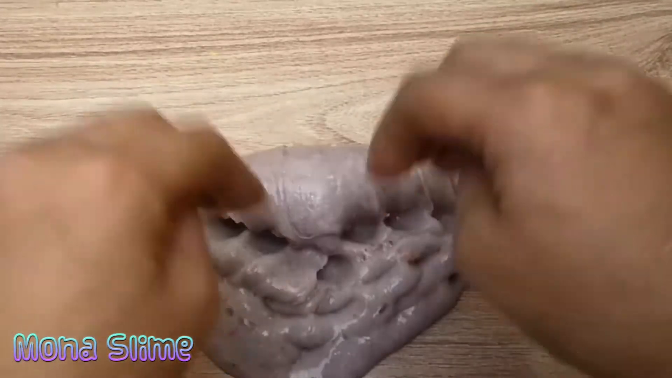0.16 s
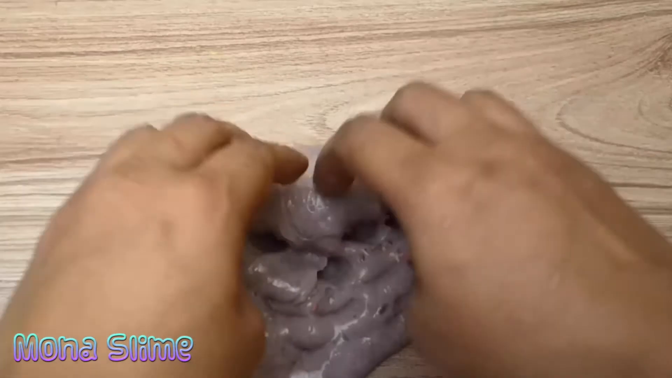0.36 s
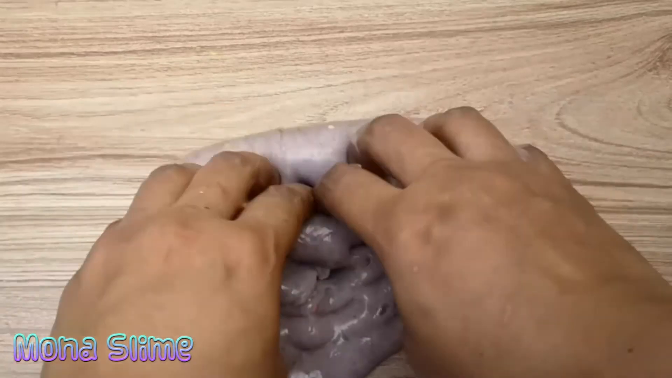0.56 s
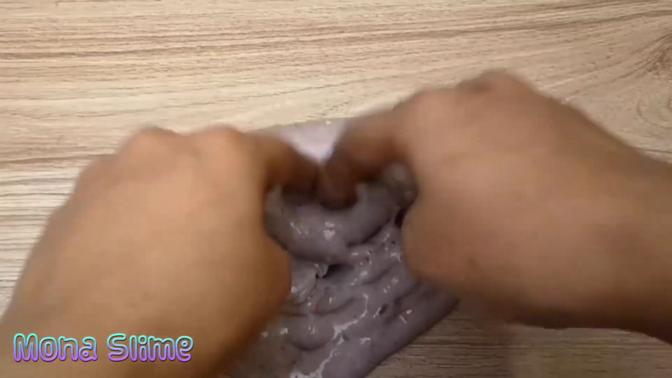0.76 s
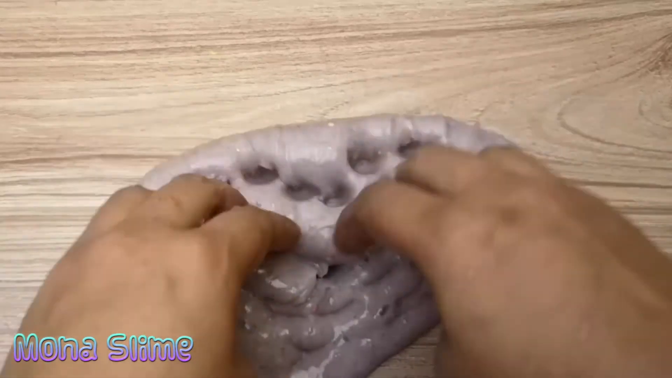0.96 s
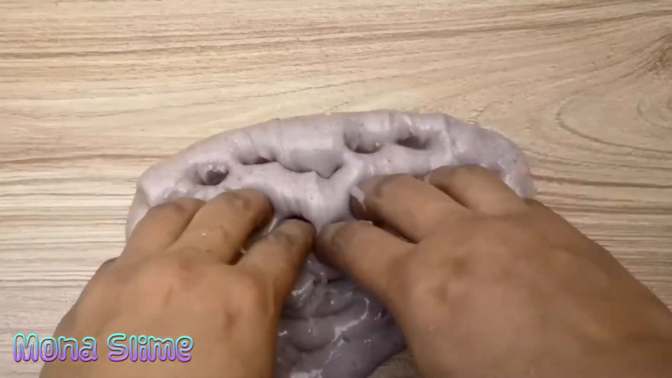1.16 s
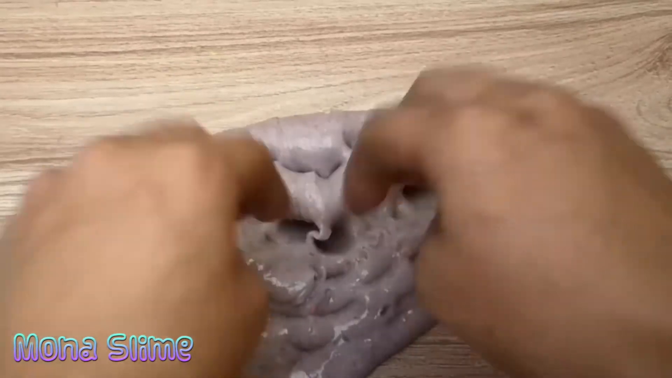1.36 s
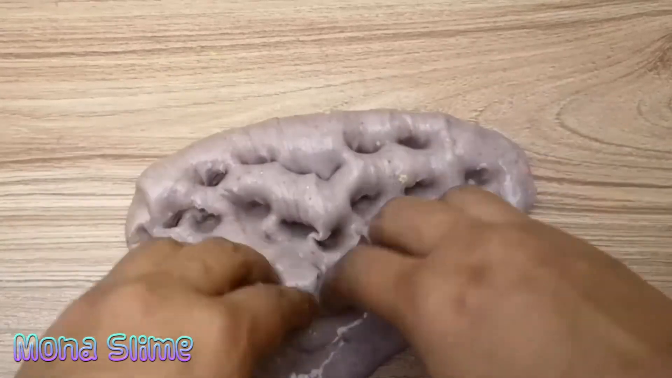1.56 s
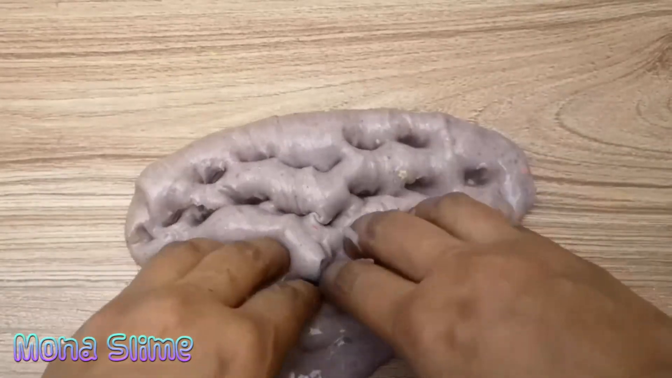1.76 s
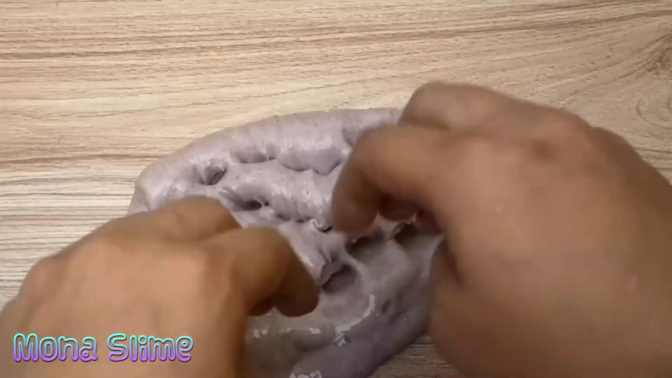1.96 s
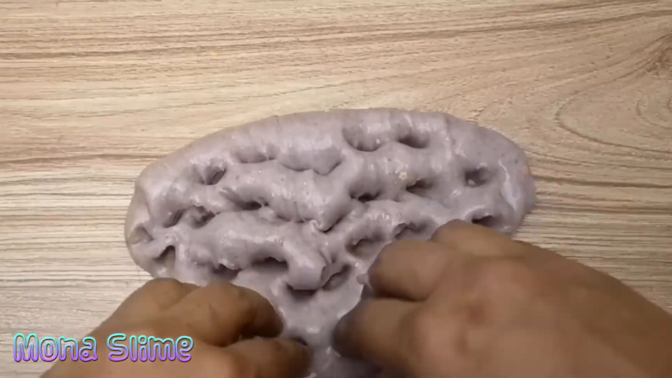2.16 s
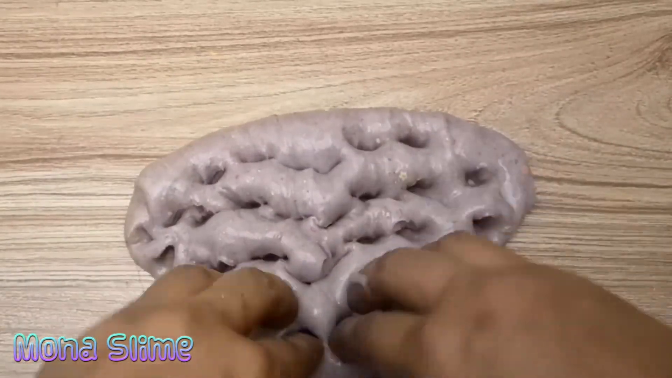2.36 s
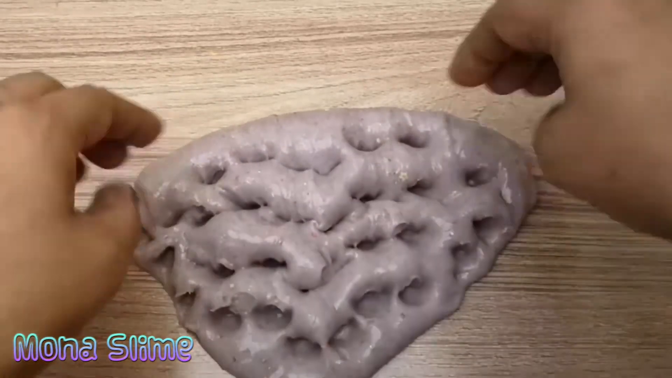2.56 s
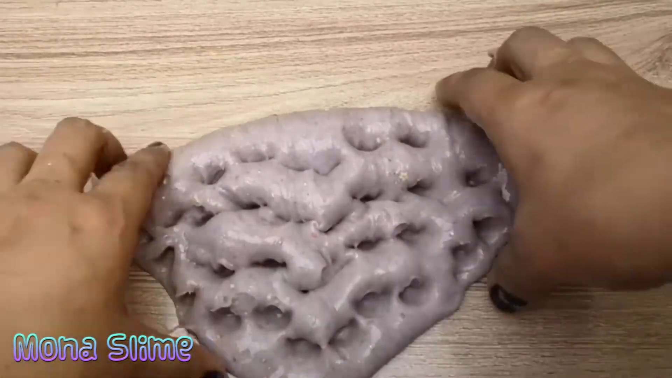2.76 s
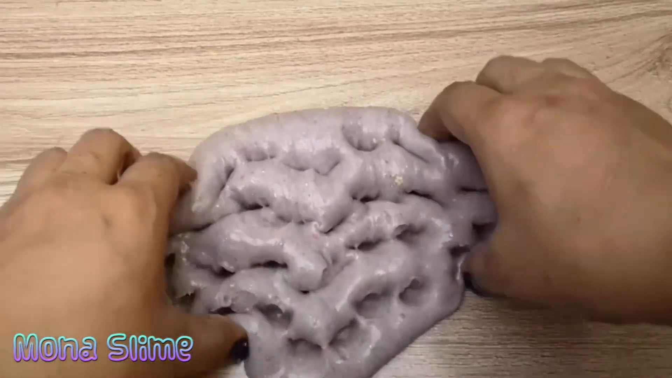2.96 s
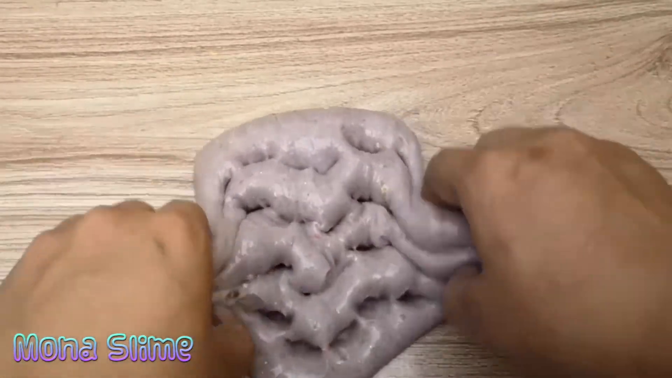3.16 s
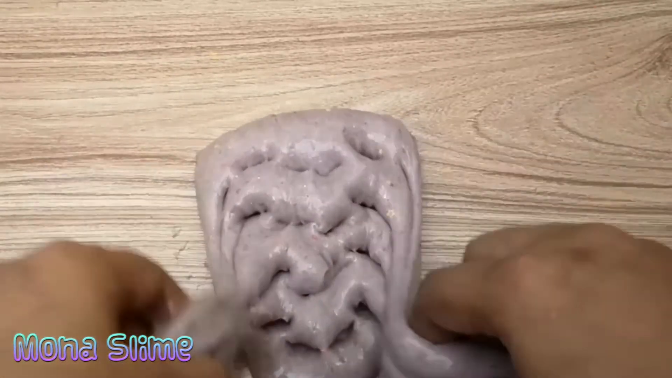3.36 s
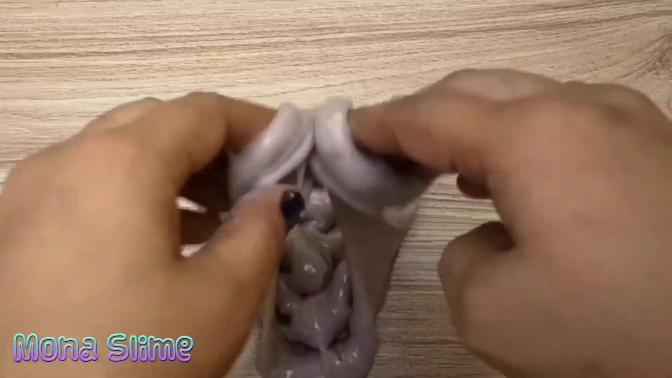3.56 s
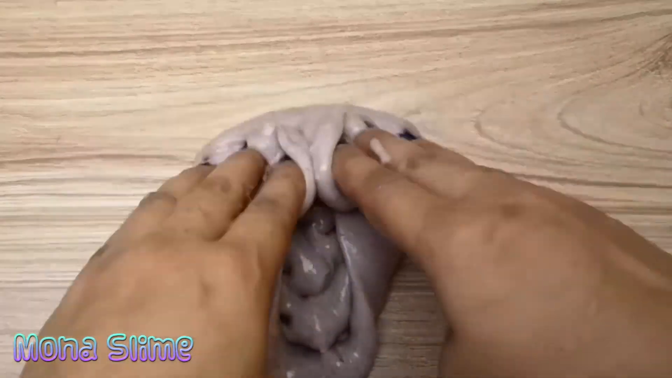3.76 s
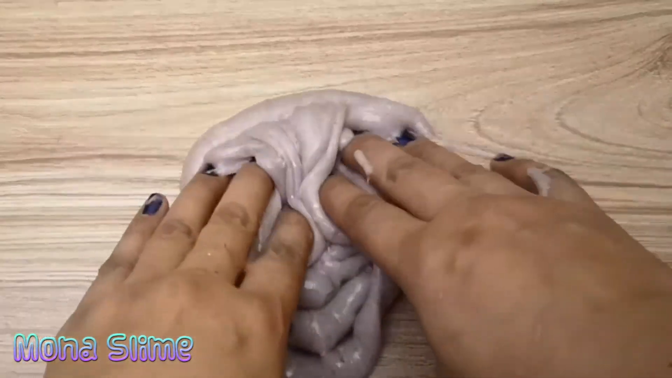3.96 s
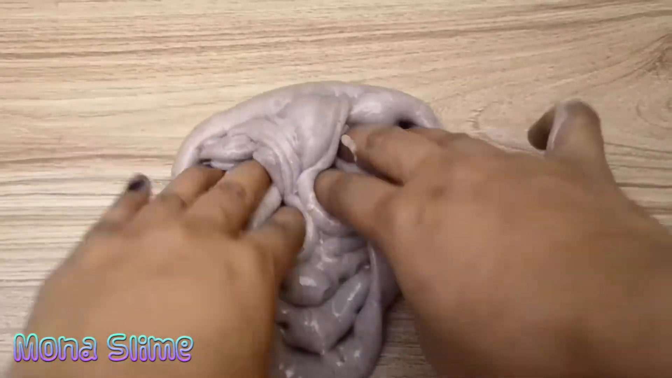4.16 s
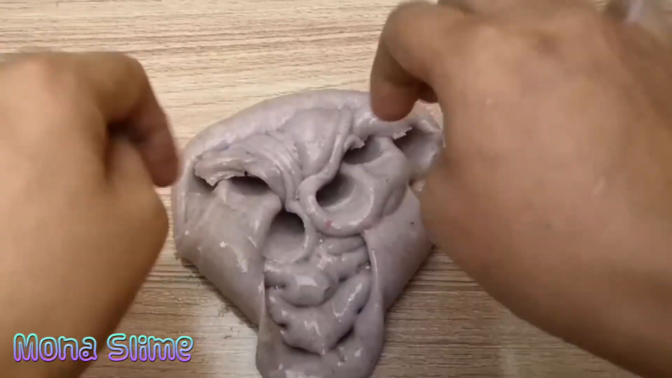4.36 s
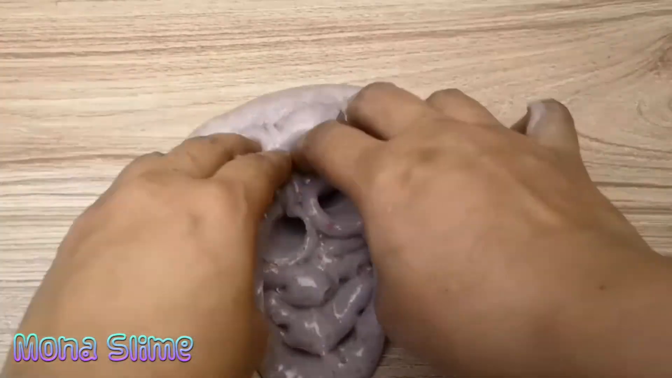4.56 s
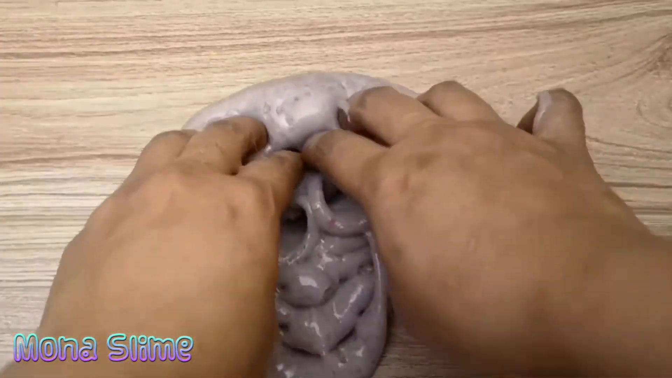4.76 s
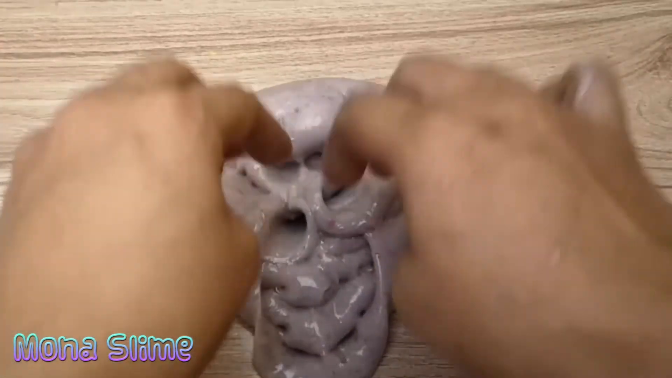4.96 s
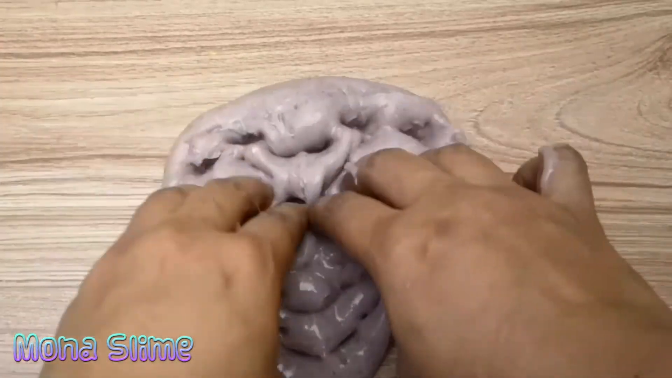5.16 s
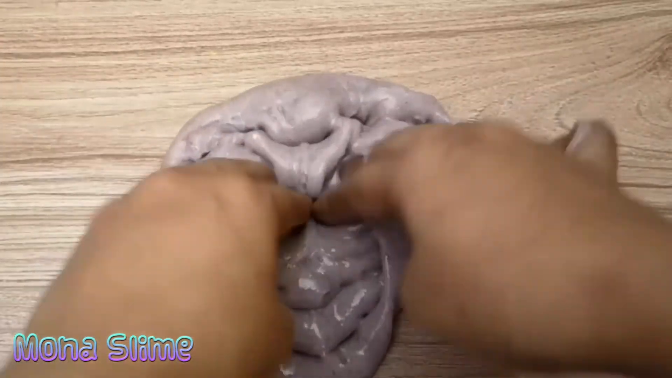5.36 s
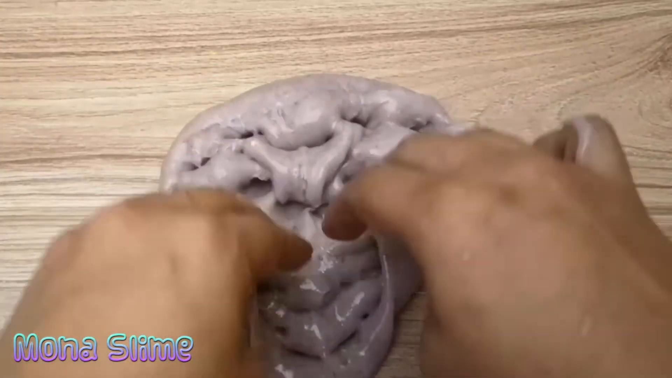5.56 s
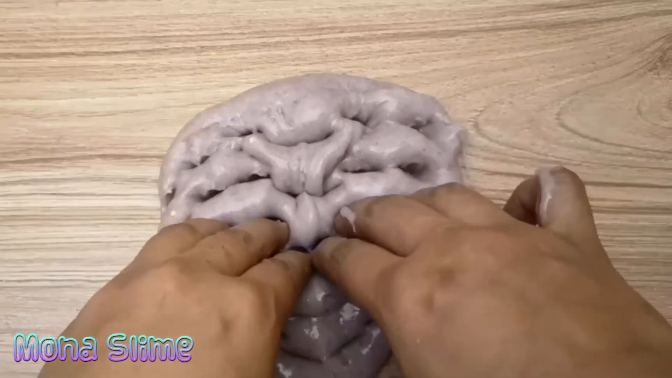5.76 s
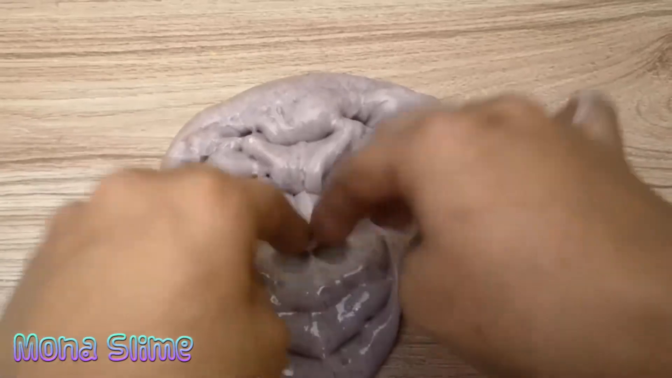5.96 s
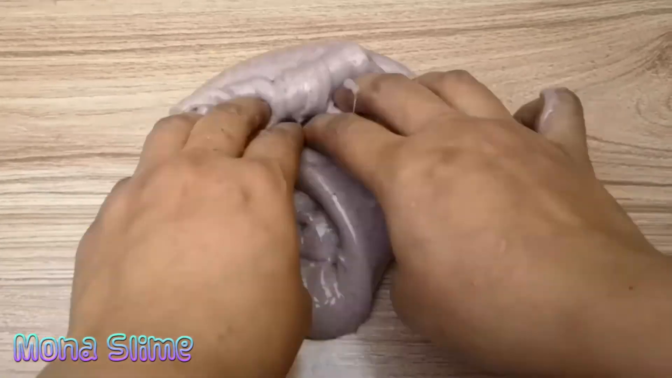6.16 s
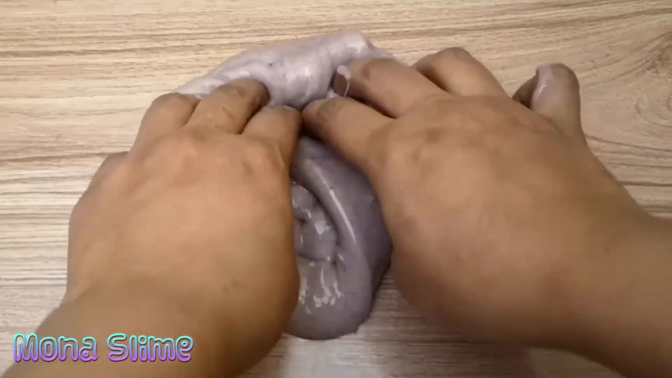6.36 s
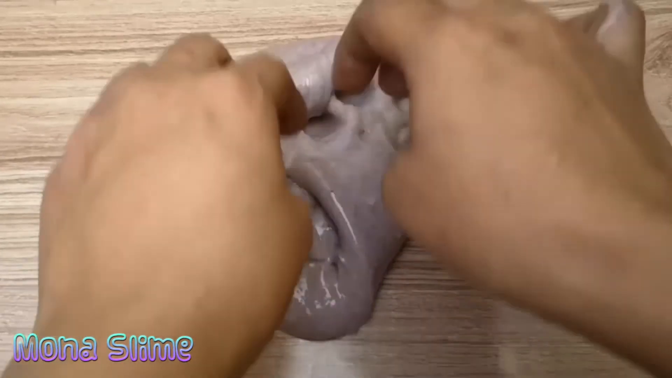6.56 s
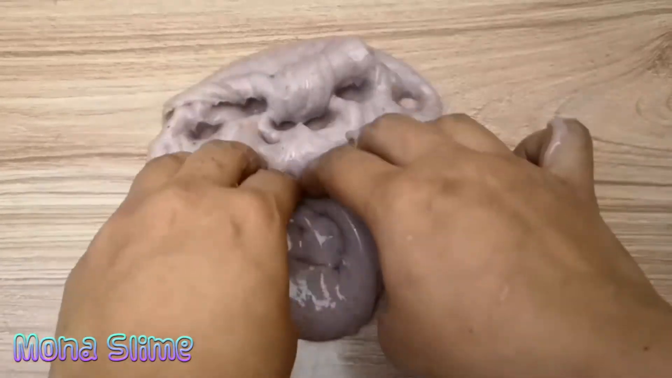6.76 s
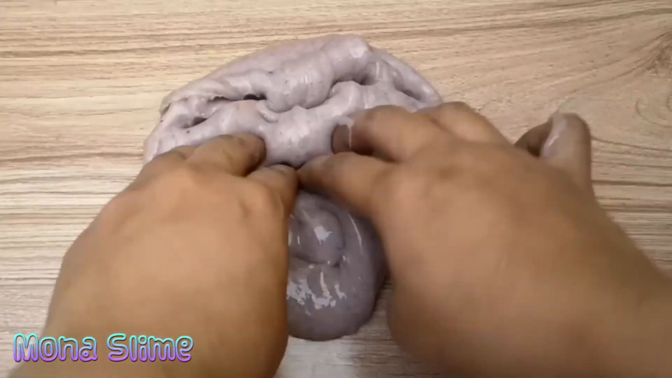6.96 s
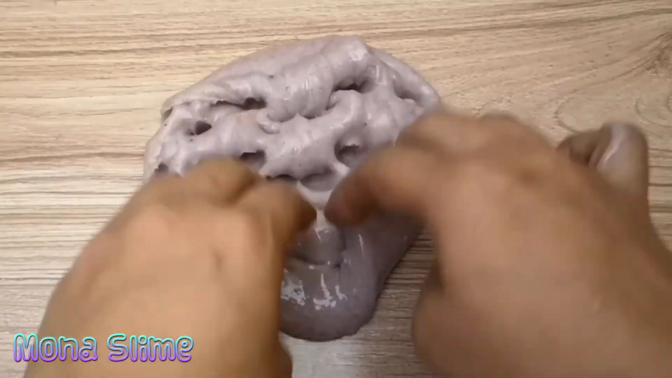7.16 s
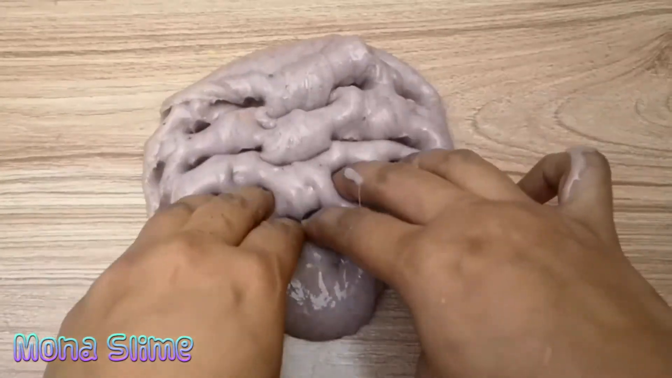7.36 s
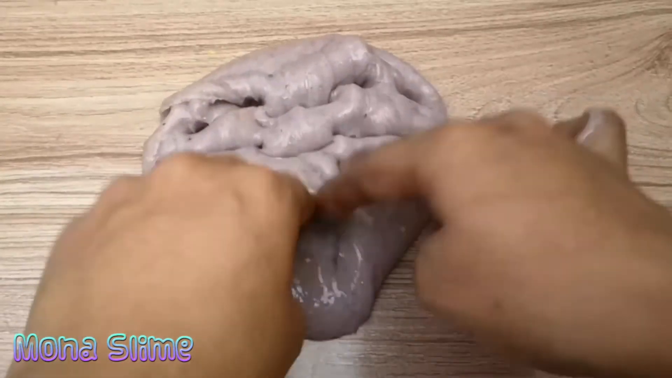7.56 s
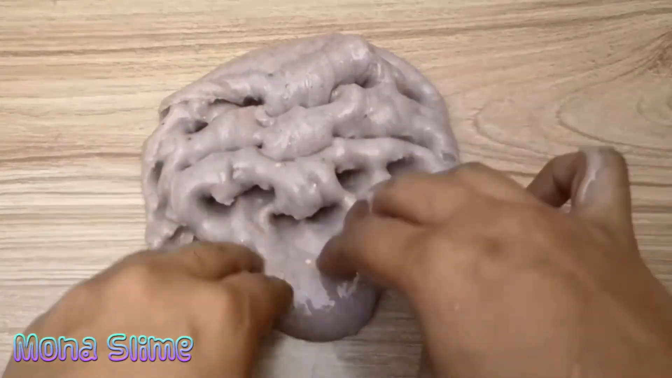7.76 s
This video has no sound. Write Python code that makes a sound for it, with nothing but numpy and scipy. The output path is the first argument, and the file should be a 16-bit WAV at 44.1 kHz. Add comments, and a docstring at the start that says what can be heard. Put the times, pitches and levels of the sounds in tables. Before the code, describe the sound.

Fingers poke thick, glossy slime on a wooden table, heard very close in stereo in a small quiet room. At the very start a few light, thin pops finish a press. Fuller presses follow at about 0.8, 1.3, 1.9 and 2.4 seconds, each a rapid cluster of four to ten sharp film snaps, hollow air-pocket pops with a tiny upward chirp, and soft low thuds. From about 2.6 to 4.2 there is a pause with only an extremely faint tick near 4.1. A short bright burst comes at 4.2, then dense, crisp clusters at roughly 4.9, 5.4, 6.0, 6.5, 7.0 and 7.6. Room reflections fade quickly and are damped; the tail after 6.0 cuts off dead at 6.2. Beneath lies a faint deep rumble, mostly on the right, with a subsonic-feeling wobble and buzz swelling after each press, strongest after 4.2, and a trace of hiss.

```python
"""Fingers popping thick slime

Fingertips punch into slime on a wooden table, under a phone with two ports on a springy holder.
Films tear with a snap (shaped noise), air pockets ring for a few cycles (rising sines), the mass thuds (fading sines).
A small room answers with fading noise, and the phone's noise suppressor shortens the tails.
After each press the holder swings and buzzes; a low rumble, mostly at the right port, and a trace of hiss lie below."""
import sys
import numpy as np
from scipy import signal
from scipy.fft import rfft, irfft
from scipy.io import wavfile
from scipy.ndimage import uniform_filter1d

SR = 44100
rng = np.random.default_rng(int(sys.argv[2]) if len(sys.argv) > 2 else 0)


def transcribe(u):
    """Save the signal u as a 16-bit wav file named by the first command-line argument.

    u: samples, shape (n,) or (channels, n), limited to [-1, 1]; the rate is SR.
    q: integer samples, one column per channel.
    """
    v = np.clip(np.atleast_2d(u).T, -1, 1)
    q = np.round(v * 32767).astype(np.int16)
    wavfile.write(sys.argv[1], SR, q)


N = 343980  # length of the scene in samples

# Presses of both hands: start t/s, thud pitch ratio at first touch,
# swing of the holder at the left port level/dB, at the right port level/dB
PRESS_TABLE = [(0.051, 0.39, -74, -54), (0.77, 1.27, -80.5, -52), (1.336, 1.69, -75.5, -52),
               (1.893, 2.15, -73, -51.5), (2.434, 1.66, -59.5, -47), (4.224, .8, -49, -42.5),
               (4.869, 1.35, -62.5, -48), (5.396, 1.32, -56.5, -48), (5.952, 1.6, -58.5, -47.5),
               (6.495, 1.63, -72, -53.5), (7.034, 1.38, -66, -49.5), (7.572, 1.61, -63, -49)]
LEAD = 512  # samples of each pop that come before its tear
TAIL_STOP_S, TAIL_RESUME_S = 6.2, 6.4  # the pops fall silent between these times


def undb(db):
    """Turn decibels into a plain amplitude factor."""
    return 10 ** (np.asarray(db) / 20)


def on_log(hz, points_hz, db):
    """Draw straight lines between points on a log-frequency axis."""
    return np.interp(np.log(np.maximum(hz, 1)), np.log(points_hz), db)


def resonance(x, hz, width_hz):
    """Let one resonance ring: a band-pass applied twice, scaled to rms 1."""
    b, a = signal.iirpeak(hz, hz / width_hz, fs=SR)
    y = signal.lfilter(b, a, signal.lfilter(b, a, x))
    return y / np.sqrt(np.mean(y ** 2))


def resonant_noise(table):
    """Add up noise-driven resonances, separate at each port, from rows of f/Hz, width/Hz, level/dB."""
    total = np.zeros((2, N))
    for hz, width_hz, db in table:
        noise = rng.standard_normal((2, N))
        total += undb(db) * np.array([resonance(port_noise, hz, width_hz) for port_noise in noise])
    return total


def film_snap(ahead, noise, fade_in, snap_db, lower_db):
    """The film tears: a click and ragged noise, split into two bands."""
    tear_db, tear_s = -20, .0007  # noise level against the click; its decay time
    lower_edge_hz, upper_edge_hz = 3360, 5830
    t = np.maximum(ahead, 0)
    tear = undb(tear_db) * np.exp(-t / tear_s) * (ahead >= 0)
    crack = (ahead == 0) + noise * (tear + fade_in)
    high = signal.butter(2, upper_edge_hz, "high", fs=SR, output="sos")
    band = signal.butter(2, (lower_edge_hz, upper_edge_hz), "band", fs=SR, output="sos")
    upper = -signal.sosfilt(high, crack)
    lower = signal.sosfilt(band, crack)
    return undb(snap_db) * upper + undb(lower_db) * lower


def pocket_ring(ahead, noise, fade_in, hz):
    """The air pocket rings and dies in a few cycles, its pitch rising as the hole opens, with a rasp of air."""
    cycles, glide = 1.86, 0.045  # cycles to fall 20 dB; strength of the pitch rise
    early_cycles, rough = 0.57, 0.24  # ring starts this far before the tear; share of rasp from escaping air
    turns = np.maximum(hz * ahead + early_cycles, 0)
    tone = np.sin(2 * np.pi * turns * (1 + glide * np.minimum(turns / cycles, 1)))
    mouth = signal.iirpeak(hz, 1.2, fs=SR)
    rasp = signal.lfilter(*mouth, signal.lfilter(*mouth, noise))
    rasp /= rasp.std()
    swell = undb(-20 * turns / cycles) * turns ** 2 / (turns ** 2 + early_cycles)
    return (tone + rough * rasp) * swell + undb(14) * rasp * fade_in


def soft_thud(t, pitch, chance):
    """The slime and table top shake in a few low, fading modes, started gently by a soft finger."""
    # Modes of slime and table top: f/Hz, level/dB, time to fall 60 dB t/s
    thud_modes = [(324, -4, 0.012), (422, -5.5, 0.017), (560.2, 1, 0.022), (712, -2, 0.024),
                  (877, -5.5, 0.0062)]
    rise_s = 0.0012
    thud = np.zeros(len(t))
    for k, (hz, db, t60) in enumerate(thud_modes):
        # each thud differs a little in mode level and pitch, and at random in sign
        size = undb(db + 1.8 * chance[-1 - k] - 60 * t / t60) * np.sign(chance[-17 - k])
        mode_hz = hz * pitch * (1 + 0.048 * chance[-9 - k])
        thud += size * np.sin(2 * np.pi * mode_hz * t)
    return thud * (1 - np.exp(-(t / rise_s) ** 2))


def pop(snap_db, lower_db, pocket_hz, pocket_db, thud_db, thud_pitch, chance):
    """One pop adds the snap of the film, the ring of the trapped air and the thud of the mass."""
    ahead = (np.arange(4096) - LEAD) / SR  # time from the tear, negative before it
    noise = chance[:4096]
    # faint noise rises for a few milliseconds before the click
    fade_in = undb(-45) * np.exp(np.minimum(ahead, 0) / .003) * (ahead < 0)
    snap = film_snap(ahead, noise, fade_in, snap_db, lower_db)
    ring = pocket_ring(ahead, noise, fade_in, pocket_hz)
    thud = soft_thud(np.maximum(ahead, 0), thud_pitch, chance)
    return snap + undb(pocket_db) * ring + undb(thud_db) * thud


def all_pops():
    """List every pop; thuds settle to their own pitch as the fingers sink in, and ticks are bare snaps."""
    # Bursting pockets: t/s, upper half of the snap level/dB, lower half of the snap level/dB,
    # pocket f/Hz, pocket level/dB, thud level/dB, left minus right level/dB
    burst_pockets = [(.012,-7,-12,4620,-41,-74,6),(.1283,-15.5,-25,3360,-28.5,-34,-2),(.139,-35,-23,3760,-35.5,-43,10),(.143,-24,-9,2920,-17.5,-29,10.5),
                     (.7688,0.5,-3,1400,-19,-33,12),(.771,-4,2,1480,-15.5,-32.5,3),(0.7729,-1,6.5,1510,-11,-33.5,4.5),(.775,-11.5,-7,1720,-1.5,-30.5,0),(.796,-12.5,-6.5,1260,-12.5,-33.5,9),(.802,-4.5,-1,930,-12.5,-19.5,-0.5),(.8045,-12.5,3.5,2540,-1,-26.5,4.5),(.808,-0.5,-0.5,1073,-9,-16.5,-5),(.816,-7,2,985,-19.5,-24.5,4),(.8183,-17.5,-4.5,929,-13.5,-26,-7),
                     (1.3352,-4,-9.5,2480,-12.5,-32.5,3.5),(1.338,-1,-5,1650,-10,-46.5,9),(1.3395,0,4.5,2160,-1.5,-46,5.5),(1.3438,-13,3.5,1043,-3,-25.5,-5),(1.3569,-6.5,3,1600,-26.5,-45.5,4.5),(1.3633,0,8.5,3750,-12,-49.5,11),(1.3656,-11.5,-3.5,2640,-1.5,-37.5,-6.5),(1.3735,-10.5,2,990,-7.5,-21,5.5),
                     (1.893,-9,-4,1030,-15.5,-49,2.5),(1.9023,-8.5,5,3630,-2.5,-34.5,-7.5),(1.92,5.5,11.5,2200,-9,-42,-1),(1.932,-16,-13,1230,-10,-39.5,1.5),(1.9376,-18,-8,935,-11,-27.5,-3.5),
                     (2.434,-0.5,-2.5,4030,-35,-46,6.5),(2.4508,2,8.5,4100,-21,-30,-1),(2.4687,-16.5,-4.5,2300,1,-20.5,-3.5),(2.482,6,8,4030,1.5,-29,2.5),
                     (4.223,6,11,2400,-7.5,-31,2.5),(4.2419,-3,-6.5,1750,-25,-44,11.5),(4.252,-25,-21.5,2600,-23,-31,-6.5),
                     (4.8705,2.5,5.5,2060,-6.5,-21.5,2.5),(4.8735,-25.5,-19,2490,0,-38,2.5),(4.8962,-9.5,-10.5,2080,-6.5,-30.5,-7.5),(4.8986,-2,9,1170,-13.5,-18.5,-3),
                     (5.3965,-6.5,-12.5,2600,-4.5,-28.5,9),(5.3986,-3,10,1207,-6.5,-28,-0.5),(5.4245,-16,-14.5,1610,-8,-34,-24.5),(5.4261,5.5,7.5,2350,1.5,-16,7.5),(5.4362,-1,7.5,1270,-8,-38,9.5),(5.438,-2,-15.5,1010,-14.5,-21.5,3),(5.4592,-1.5,-16,1010,-27.5,-23.5,-16),
                     (5.9421,-27,-25,2430,-31,-58.5,-0.5),(5.953,-10.5,-3.5,2610,-6,-29,-1),(5.9684,-6,-1,1010,-22,-23,-.5),(5.9721,-32,9,2500,1,-54,2.5),(5.9745,-15.5,-3,1480,-10,-24,2.5),(5.9857,0,0.5,2480,-1.5,-24.5,0),(5.9883,-12.5,-12,940,-5.5,-25.5,5),
                     (6.4942,-6.5,-1.5,3010,-8,-41,5),(6.505,-16,-3.5,2960,0.5,-57,7.5),(6.5088,-14,-14,3240,2.5,-36.5,-4),(6.5202,-5.5,-7.5,2670,-7.5,-28.5,-2.5),(6.5235,-6.5,-21,970,-27.5,-63,-6),(6.5342,-4.5,-5,1140,-17,-33,-1),
                     (7.034,-6,-1.5,2170,-13,-28,1),(7.039,-18.5,-13,1955,-10.5,-56.5,-7),(7.067,0,1,2500,-5,-22.5,-13),(7.0693,6,8,2580,0.5,-27.5,3.5),(7.0739,2,2,880,-6,-17,0.5),(7.0815,-8,-1.5,2800,-2,-25,-2.5),
                     (7.5722,-33,-7.5,3550,0,-58,1.5),(7.5755,-14,5.5,1270,-11.5,-32,-8),(7.5868,-9.5,2.5,2100,-3,-28.5,5),(7.5975,-14.5,-18,2710,-6,-25,16),(7.6032,-7.5,0,1770,-7,-27,-10),(7.6187,2.5,9.5,2800,-7,-25,4.5)]
    # Faint films that part with no pocket behind them: t/s, snap level/dB, left minus right level/dB
    bare_films = [(.0284, -39, 4), (0.088, -35.5, 9.5), (.5821, -45.5, 25), (1.0762, -28, 7),
                  (1.6513, -45, 16), (1.727, -45.5, 23), (2.4176, -21.5, 12), (4.089, -56.5, 23)]
    sink_s = 0.025
    film_lower_db = -22.5  # lower half of a bare snap against its upper half
    starts, first_pitch = np.transpose(PRESS_TABLE)[:2]
    rows = []
    for s, *voice, pan_db in burst_pockets:
        k = np.argmin(np.abs(starts - s))  # nearest press
        age = max(s - starts[k], 0)
        thud_pitch = 1 + (first_pitch[k] - 1) * np.exp(-age / sink_s)
        rows.append((s, *voice, thud_pitch, pan_db))
    for s, db, pan_db in bare_films:
        rows.append((s, db, db + film_lower_db, 1000, -np.inf, -np.inf, 1, pan_db))
    return rows


def near_path(scatter_noise, lucks):
    """The straight sound, a short smear from pitted slime and fingers, and bounces off table and hands."""
    # Bounces: delay t/s, level/dB
    near_bounces = [(.0009, -31), (.0022, -10.5)]
    scatter_db, scatter_t60_s = -8.5, 0.016
    t = np.arange(1024) / SR
    path = scatter_noise * undb(-60 * t / scatter_t60_s)
    path *= undb(scatter_db) / np.sqrt(np.sum(path ** 2))
    path[0] = 1
    for luck, (lag, db) in zip(lucks, near_bounces):
        varied_lag = lag * (1 + .15 * np.tanh(luck))
        path[int(varied_lag * SR)] += np.sign(luck) * undb(db)
    return path


def slime():
    """Place all pops with near echoes at each port, and their plain sum that goes out into the room."""
    near, out = np.zeros((2, N + 8192)), np.zeros(N + 8192)
    rows = all_pops()
    chances = rng.standard_normal((len(rows), 6300))
    for (s, *voice, pan_db), chance in zip(rows, chances):
        sound, at = pop(*voice, chance), int(s * SR)
        out[at:at + len(sound)] += sound
        for port, side in enumerate((1, -1)):
            first = 4096 + 1024 * port
            path = near_path(chance[first:first + 1024], chance[6200 + 8 * port:])
            heard = signal.fftconvolve(sound, path)
            near[port, at:at + len(heard)] += undb(side * pan_db / 2) * heard
    return near[:, LEAD:N + LEAD], out[LEAD:N + LEAD]


def room(x):
    """Dense reflections, unrelated at the two ports, die at a different rate in each frequency band."""
    # Octave bands: centre f/Hz, time to fall 60 dB t/s, level against the other bands/dB
    room_bands = [(400, 0.59, -1.5), (756, 0.38, 6), (1400, 0.4, 4), (2800, 0.42, 2), (6050, 0.41, 3),
                  (11500, 0.5, 2.5)]
    room_db, rise_s = -6, 0.0034
    t = np.arange(SR // 2) / SR
    tail = np.zeros((2, len(t)))
    for hz, t60, db in room_bands:
        edges_hz = [hz / np.sqrt(2), hz * np.sqrt(2)]
        band = signal.butter(2, edges_hz, "band", fs=SR, output="sos")
        tail += signal.sosfilt(band, rng.standard_normal((2, len(t)))) * undb(db - 60 * t / t60)
    tail *= 1 - np.exp(-t / rise_s)
    tail /= np.sqrt(np.mean(np.sum(tail ** 2, 1)))
    return undb(room_db) * signal.fftconvolve(x[None], tail, axes=1)[:, :N]


def ports(x):
    """Each port colours the sound with little delay; a phase shift sets the right apart from the left."""
    # Port colour, the left one strongest near 8 kHz: f/Hz, left level/dB, right level/dB, left phase lead/rad
    port_colour = [(50, -32, -34.5, .5), (187, -28.5, -21, 2.1), (286, -15.5, -5.5, 2),
                   (457, 3, -6.5, 0.55), (784, -4, -3, 2.5), (1260, 4.5, 1.5, 0.19), (2300, 2, -1, 1.1),
                   (4750, -3, -6, 1.6), (6600, -1, -2.5, 0.8), (7720, 8, -5, 1.1),
                   (10450, -7.5, -12.5, 1.5), (9700, -5, -10.5, 1.4), (15400, -13, -15.5, 0.81),
                   (16346, -28.5, -30, 1.7)]
    hz = np.fft.rfftfreq(2048, 1 / SR)
    points_hz, *dbs, lead = np.transpose(port_colour)
    # folding the cepstrum (spectrum of the log gain) gives the phase that delays least
    cep = irfft(np.log(undb([on_log(hz, points_hz, db) for db in dbs])))
    cep[:, 1:1024] *= 2
    cep[:, 1025:] = 0
    gain = np.exp(rfft(cep))
    right_phase = np.angle(gain[0]) - on_log(hz, points_hz, lead)
    gain[1] = np.abs(gain[1]) * np.exp(1j * right_phase)
    response = np.roll(irfft(gain), 256, axis=1)  # room for what comes early
    return signal.fftconvolve(x, response, axes=1)[:, 256:N + 256]


def suppress(x):
    """The suppressor turns each narrow band down as its held power sinks towards the noise estimate."""
    # What the suppressor takes for noise: f/Hz, left level/dB, right level/dB
    noise_estimate = [(300, -58.5, -63), (666, -76, -73.5), (2500, -74, -75), (4870, -77.5, -73.5),
                      (7950, -73, -80), (14200, -82.5, -81.5)]
    strength, hold = 1.1, 0.22  # power of the gain curve; share of held power kept from frame to frame
    hz, _, spec = signal.stft(x, SR, nperseg=512, noverlap=384)
    power = uniform_filter1d(np.abs(spec) ** 2, size=7, axis=1)  # smooth over neighbouring bands
    power = np.maximum(power, signal.lfilter([1 - hold], [1, -hold], power))
    points_hz, *dbs = np.transpose(noise_estimate)
    noise = undb([on_log(hz, points_hz, db) for db in dbs])[:, :, None] ** 2
    gain = (power / (power + noise)) ** strength
    return signal.istft(spec * gain, SR, nperseg=512, noverlap=384)[1][:, :N]


def swing_size():
    """Each press makes the swing swell and fade over a wavering tremor; the holder never rests."""
    peak_s, sharp = 0.17, 5  # the swing peaks this long after a press; narrowness of its swell
    tremor_left_db, tremor_right_db, waver_db, waver_s = -104, -70, 5, 0.22
    t = np.arange(N) / SR
    waver = uniform_filter1d(rng.standard_normal(N), int(waver_s * SR))
    waver = uniform_filter1d(waver, int(waver_s * SR))
    size = undb([[tremor_left_db], [tremor_right_db]]) * undb(waver_db * waver / waver.std())
    for s, _, *dbs in PRESS_TABLE:
        age = np.maximum(t - s, 0) / peak_s
        swell = (age * np.exp(1 - age)) ** sharp
        stopped = (t > TAIL_STOP_S) & (s < TAIL_STOP_S)  # earlier swings end here
        size = size + undb(dbs)[:, None] * swell * ~stopped
    return size


def keep_bass(x):
    """Keep only what lies below about 250 Hz."""
    return signal.sosfilt(signal.butter(6, 250, fs=SR, output="sos"), x)


def holder():
    """The springy holder swings at a drifting low pitch and buzzes, weaker at the left port."""
    # Buzz of the holder: f/Hz, width/Hz, level against the swing/dB
    buzz_modes = [(38.16, 3.5, -7), (60.5, 5.7, -16), (98, 36, -22), (173, 21, -40.5)]
    swing_hz, drift_share = 18.5, .07
    drift = uniform_filter1d(rng.standard_normal(N), size=SR // 6)
    pitch_hz = swing_hz * (1 + drift_share * drift / drift.std())
    swing = np.sqrt(2) * np.sin(2 * np.pi * np.cumsum(pitch_hz) / SR)
    return keep_bass(swing + resonant_noise(buzz_modes)) * swing_size()


def low_rumble():
    """A steady rumble of noise-driven low resonances is heard mostly at the right port."""
    # Rumble before the gain of each port: f/Hz, width/Hz, level/dB
    rumble_modes = [(11.4, 13, -65), (37.7, 9.1, -71), (50, 19, -75.5), (65.6, 8.5, -70), (105, 72, -89.5),
                    (149, 12, -87), (220, 14, -107)]
    left_db, right_db = -40.5, 5
    return keep_bass(resonant_noise(rumble_modes)) * undb([[left_db], [right_db]])


def faint_hiss():
    """A trace of hiss: noise smoothed so that its lower part is stronger."""
    return signal.lfilter([1], [1, -.9], rng.standard_normal((2, N))) * undb(-114)


def scene():
    """Pops and room pass the ports and the suppressor; holder, rumble and hiss are added after it."""
    near, out = slime()
    pops = suppress(ports(near + room(out)))
    pops[:, int(TAIL_STOP_S * SR):int(TAIL_RESUME_S * SR)] = 0  # one tail stops dead
    return pops + holder() + low_rumble() + faint_hiss()


def record(dry):
    """Round the loudest peaks; nothing sounds above about 17 kHz."""
    rounded = 1.2 * np.tanh(dry / 1.2)
    top_hz = 16900
    return signal.sosfilt(signal.ellip(12, .2, 100, top_hz, fs=SR, output="sos"), rounded)


dry = scene()
out = record(dry)
transcribe(out)
```